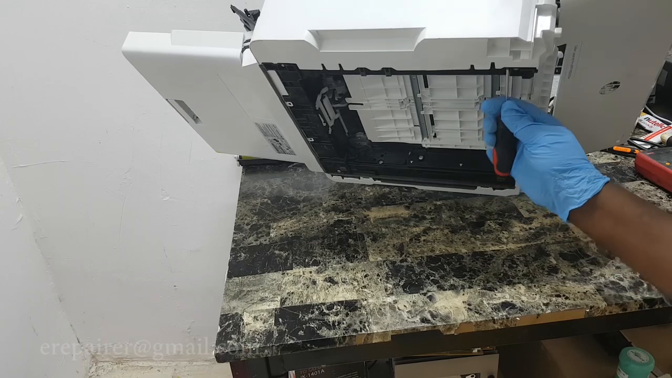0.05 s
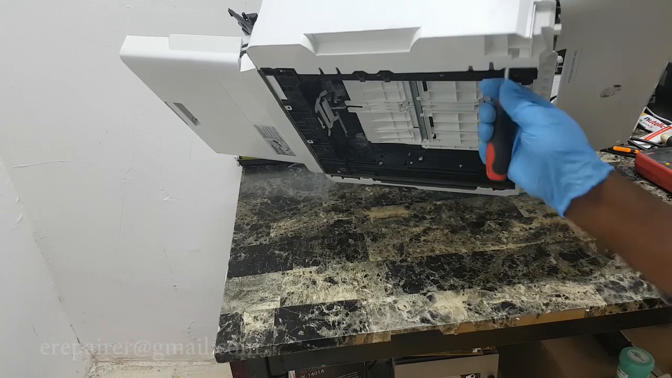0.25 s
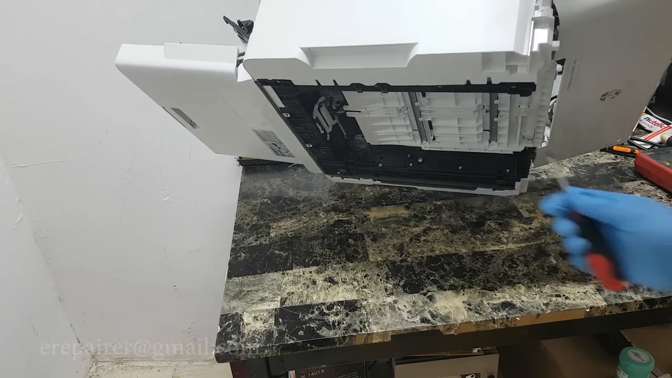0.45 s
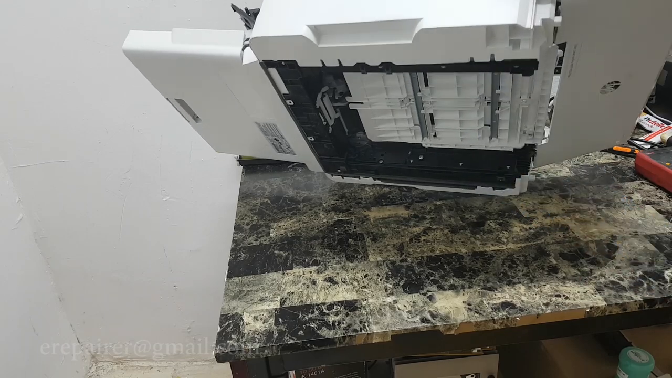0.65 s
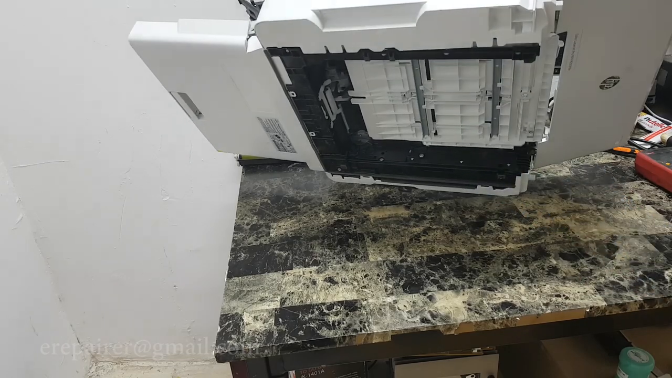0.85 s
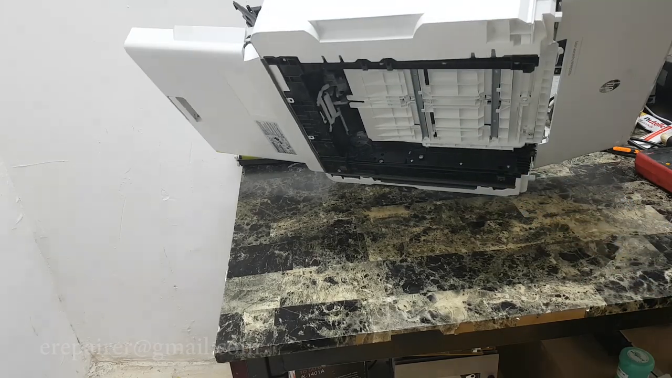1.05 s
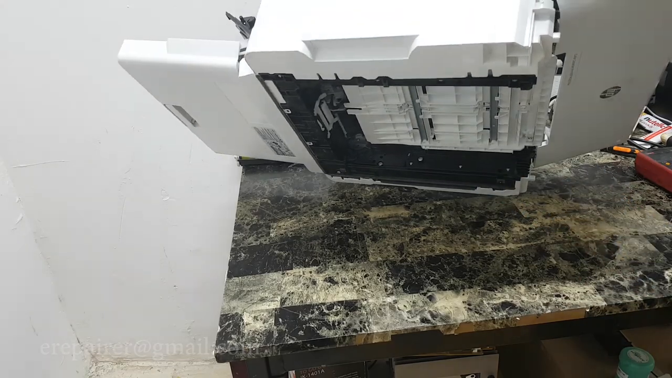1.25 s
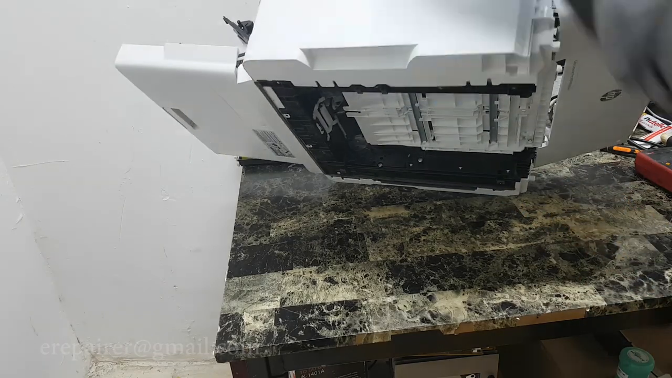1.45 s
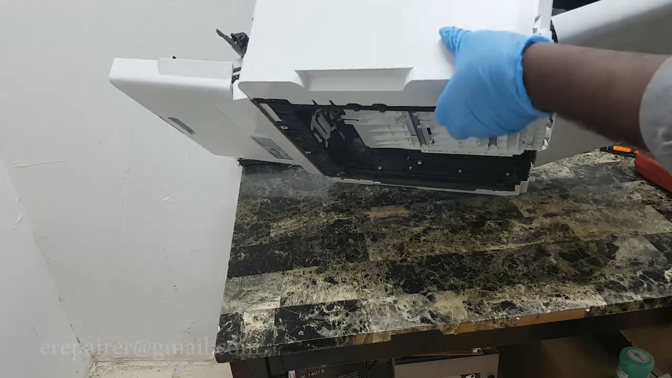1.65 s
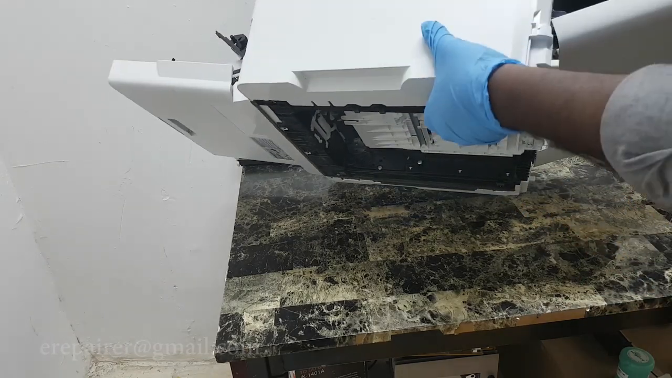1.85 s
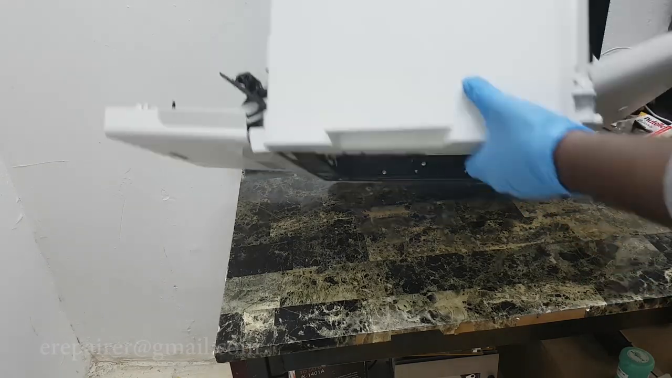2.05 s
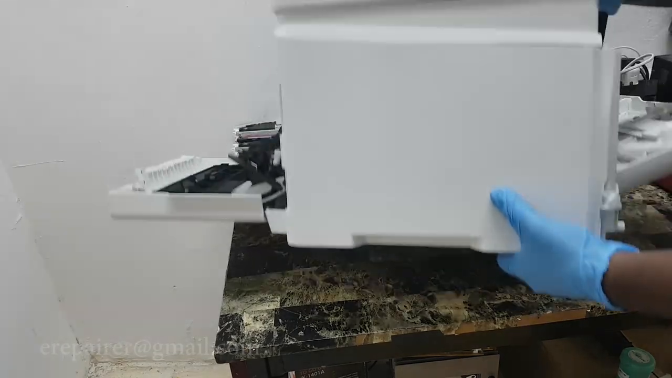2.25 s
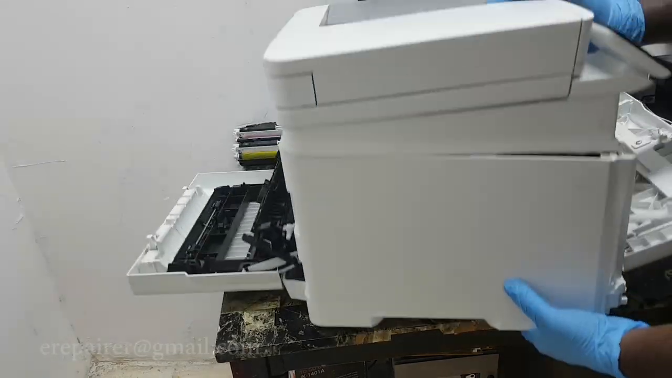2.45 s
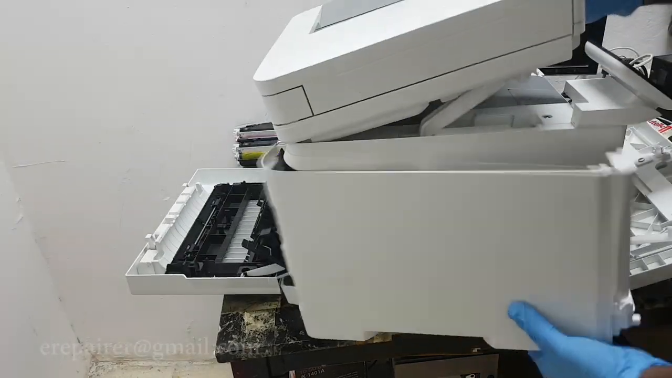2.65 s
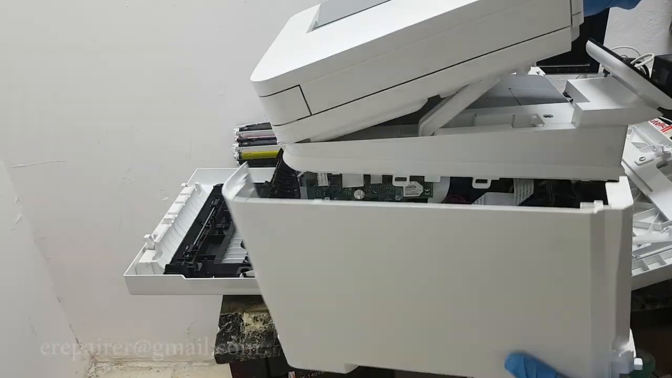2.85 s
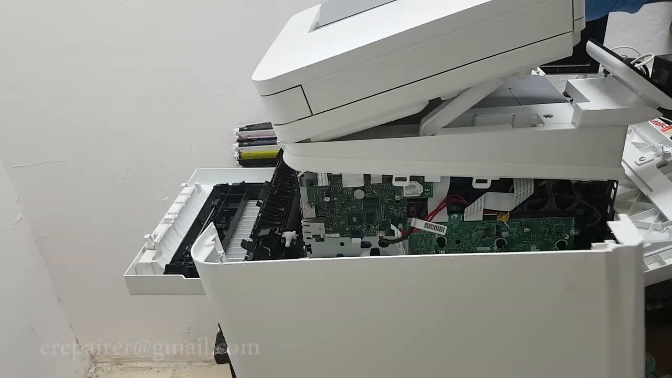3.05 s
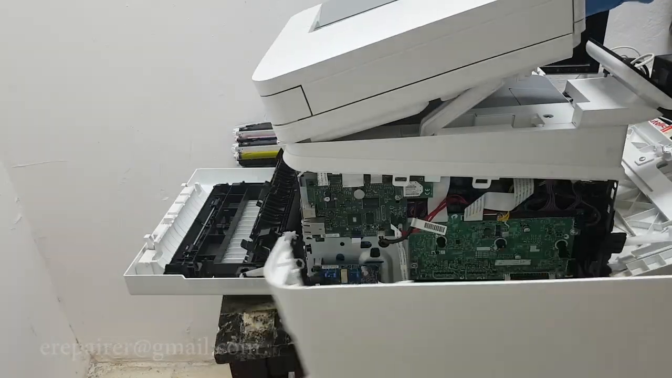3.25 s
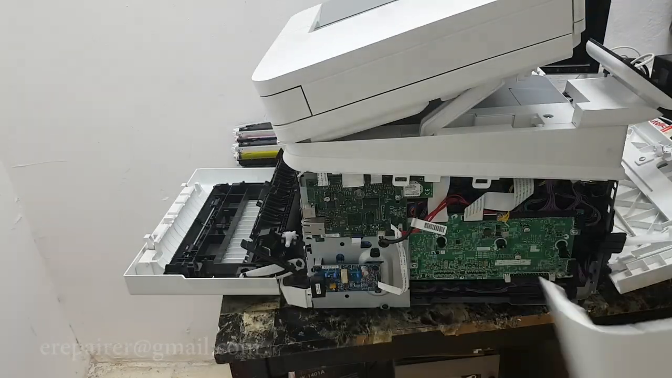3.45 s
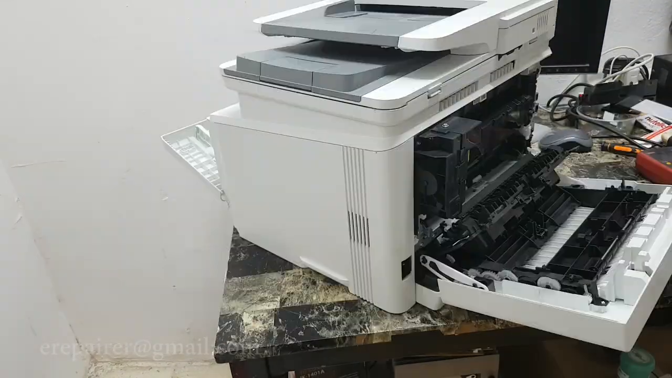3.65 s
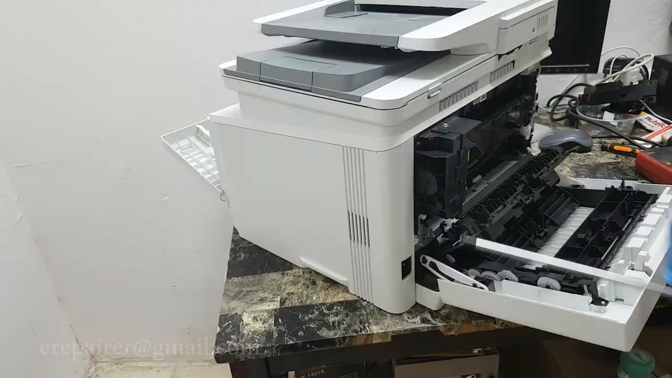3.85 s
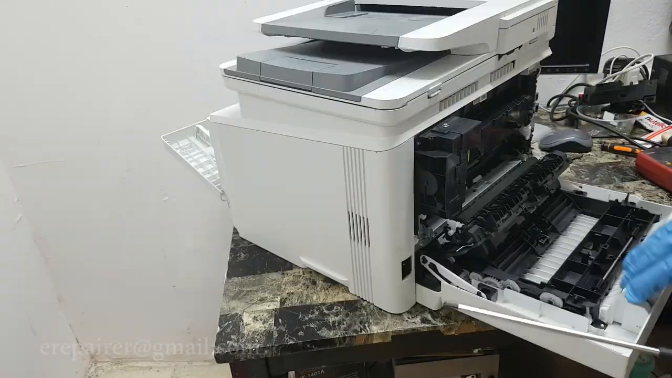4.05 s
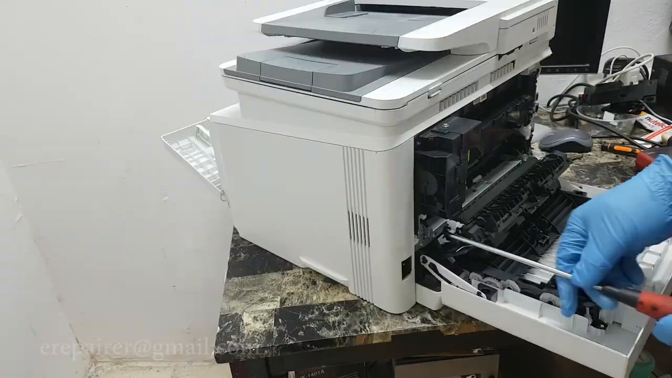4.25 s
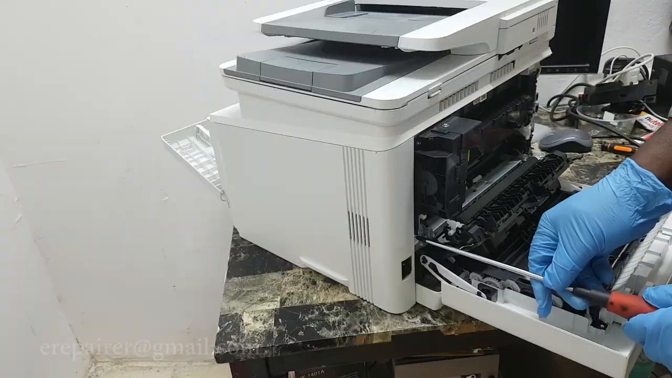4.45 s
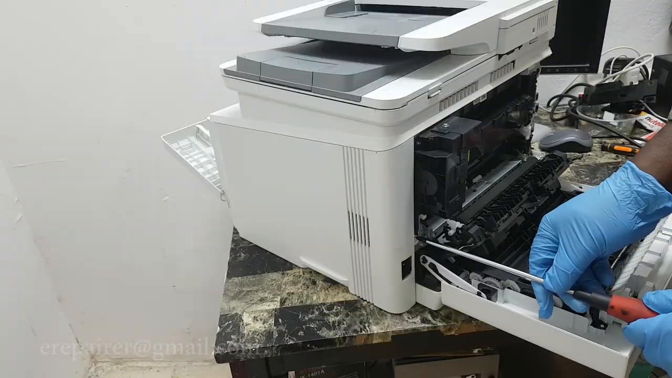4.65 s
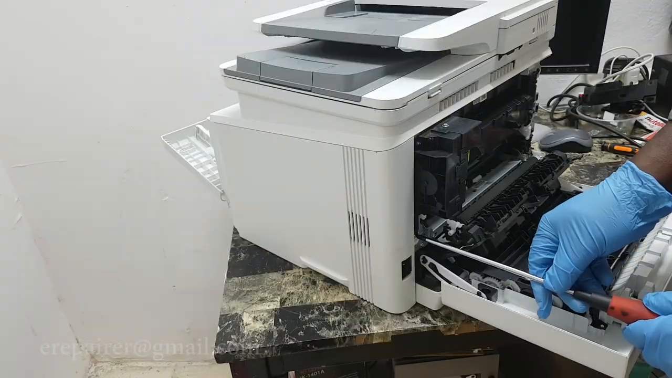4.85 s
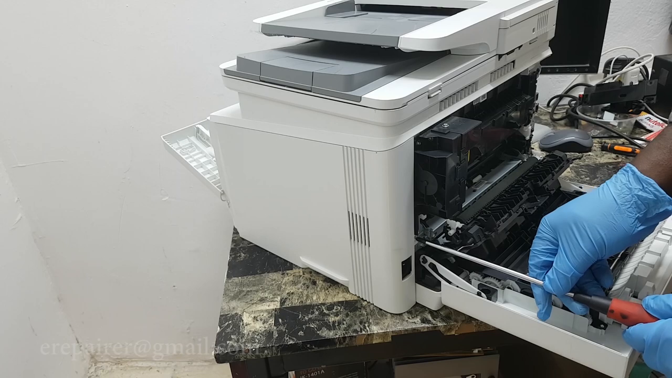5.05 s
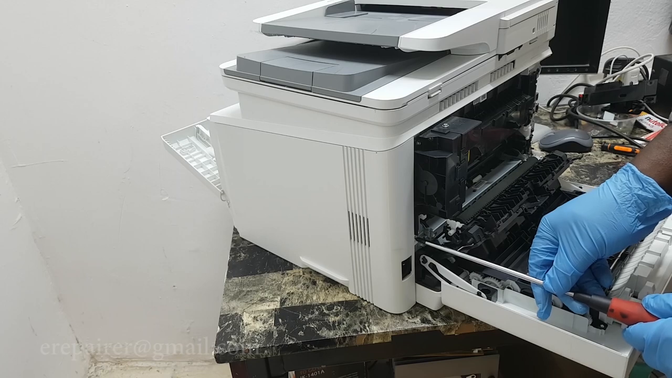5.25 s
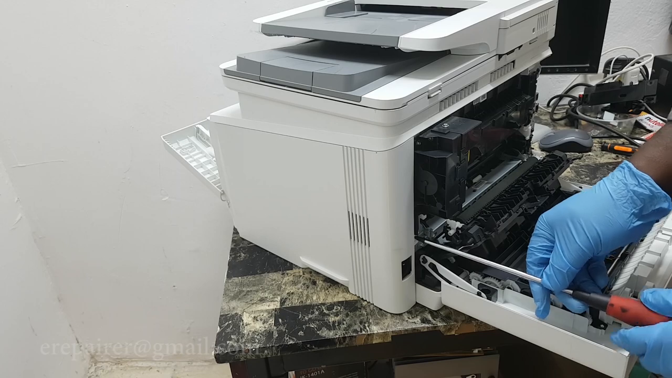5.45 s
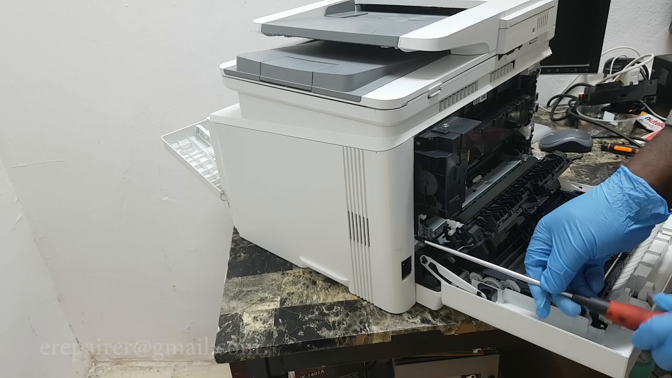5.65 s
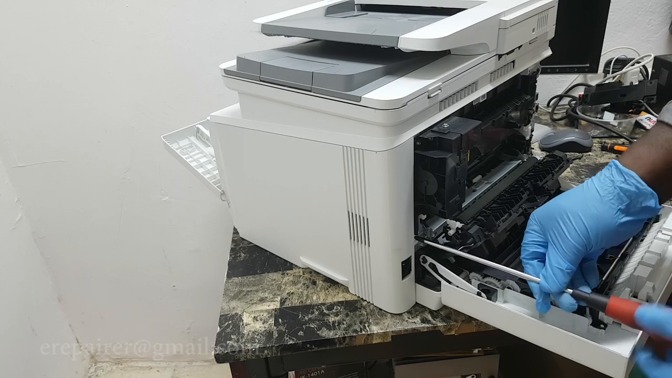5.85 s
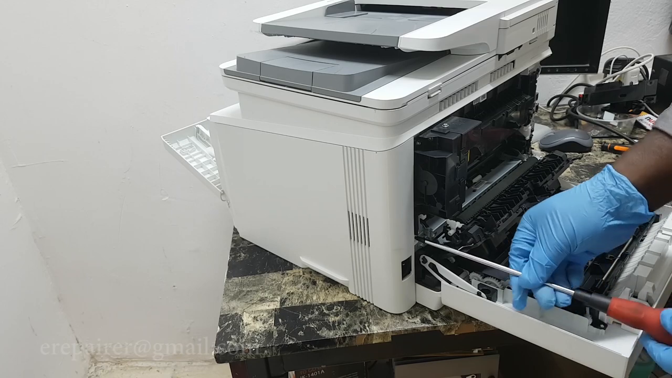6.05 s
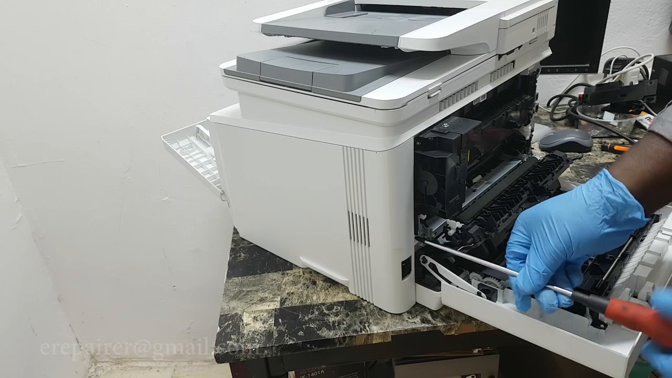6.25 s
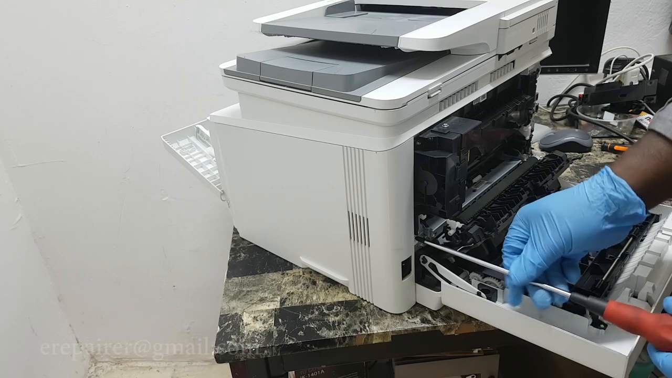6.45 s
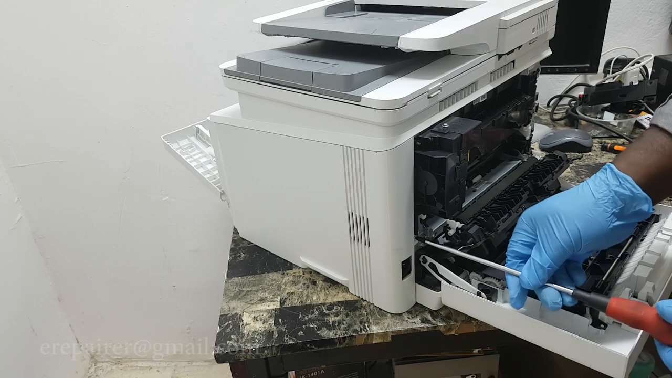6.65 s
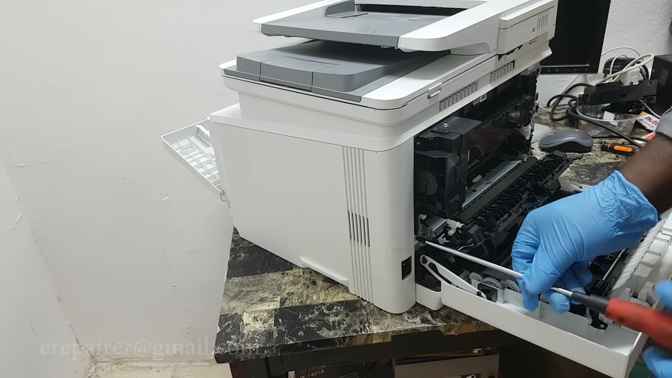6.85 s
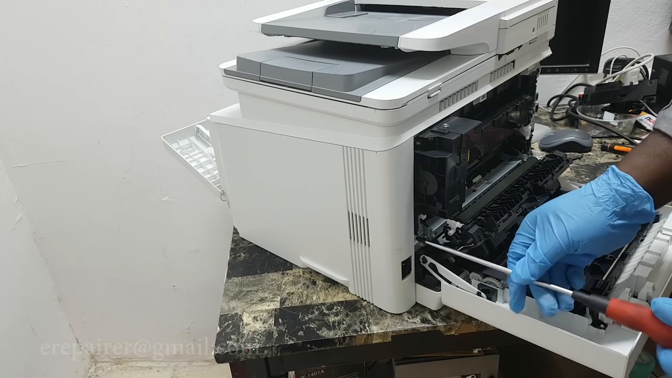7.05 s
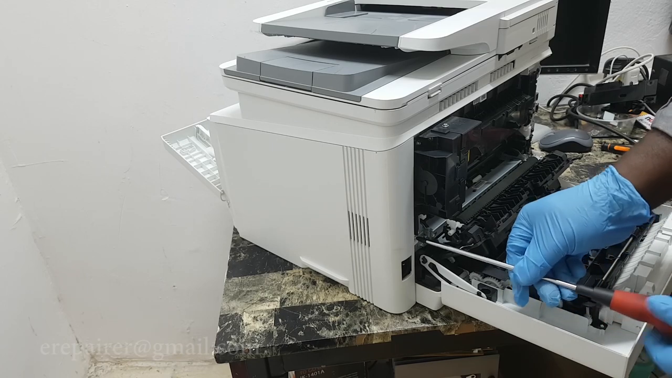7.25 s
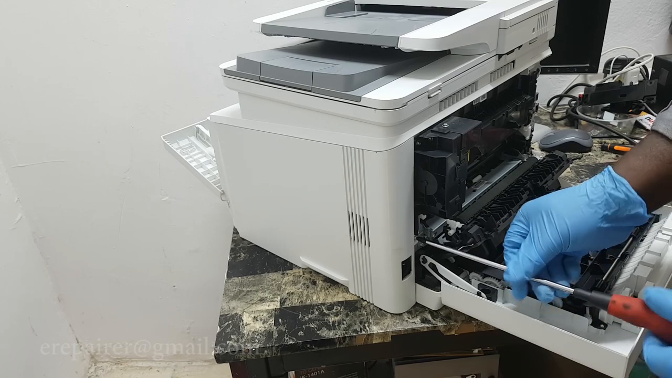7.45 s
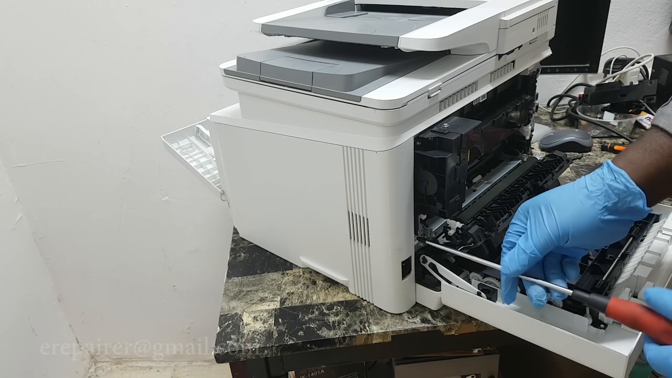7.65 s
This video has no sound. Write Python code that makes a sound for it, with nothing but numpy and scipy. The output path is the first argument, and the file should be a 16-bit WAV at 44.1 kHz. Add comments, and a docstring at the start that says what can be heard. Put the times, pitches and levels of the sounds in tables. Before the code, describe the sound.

A small hard room has a quiet, mostly low hush and faint wavering fan hum throughout. Light plastic ticks open the scene, then catches snap very loudly at 0.25-0.3 s with a hollow ring. Another bright double snap comes at 0.86 s and a faint click near 1.05. Soft, slightly grainy rubbing grows from 1 to 2.3 s, with a sharp knock at 1.75. A faint low drone swells and sinks, strongest near 2.6. Rattling knocks from 2.35 build to the loudest, crashing plastic clatter at 2.67-2.76, followed by a tiny unsteady groan at 2.9 and fading rubs until 3.5. A crisp door knock strikes at 4.01 s. From 4.5 to 5.7 light screwdriver taps ring faintly; then, to the end around 7.7, minute irregular clicks, light scrapes and nearly inaudible high squeaks. Close stereo, treble wide, short room tail.

```python
"""A plastic printer is worked on in a small hard-walled room: air and a humming fan are filtered noise and sines.
Catches snap first, each a burst of noise with ringing tones, while slightly grainy noise makes the rubbing strokes.
A faint low drone, one gliding sine, swells and sinks; the side cover knocks and breaks free with a clatter.
It groans as it slides off, in short unsteady tones; then the front door and its fittings knock.
Last, a screwdriver taps its way to a screw and turns it, with small clicks and squeaks."""
import sys
import numpy as np
from scipy import signal
from scipy.fft import rfft, irfft, next_fast_len
from scipy.io import wavfile

SR = 44100
rng = np.random.default_rng(int(sys.argv[2]) if len(sys.argv) > 2 else 0)


def transcribe(u):
    """Save the signal u as a 16-bit wav file named by the first command-line argument.

    u: samples, shape (n,) or (channels, n), limited to [-1, 1]; the rate is SR.
    q: integer samples, one column per channel.
    """
    v = np.clip(np.atleast_2d(u).T, -1, 1)
    q = np.round(v * 32767).astype(np.int16)
    wavfile.write(sys.argv[1], SR, q)


N = 340011
TIME = np.arange(N) / SR   # seconds
RING_SIZE = 20000   # length of one contact sound, in samples
CUTOFF_HZ = 16000   # top of the sound

# room air: (frequency [Hz], relative strength [dB per Hz])
AIR_SPECTRUM = [(12, -43), (20, -13), (32, -21), (74, -12.5), (96, -6.5), (163, -4), (193, -20.5),
                (222, -7.5), (310, -7), (574, -9.5), (1260, -14.5), (1660, -17.5), (1810, -18), (9140, -26),
                (16000, -32)]
AIR_LEVEL_DB = -58.5   # rms of the room air over both sides, balance included
# fan hum tones: (frequency [Hz], rms before loudness changes and balance [dB])
FAN_TONES = [(108, -71.5), (158, -72), (312, -66.5), (427, -72), (535, -75.5), (657, -78.5)]
# fan loudness change: (time [s], change [dB])
FAN_LOUDNESS = [(0, 2), (3.6, -3.5), (3.7, 0), (7.7, 1)]
# low drone: (time [s], average frequency [Hz], rms before trim, flutter and balance [dB])
DRONE_PATH = [(0.0, 98.8, -84), (0.1, 106.8, -66.5), (1.26, 102.8, -55), (1.35, 100.5, -64),
              (1.87, 98.27, -51.5), (2.13, 109.1, -51), (2.2, 112.8, -68), (2.63, 106.5, -43.5),
              (2.86, 95.8, -60.5), (3.14, 74.26, -73), (3.59, 66.87, -63.5), (3.7, 61.77, -78)]
DRONE_TRIM_DB, DRONE_FADE_DB_PER_S = -2.5, 91.5   # the fade starts after the last row

# likeness of the two microphones: (frequency [Hz], correlation [0 to 1])
MIC_LIKENESS = [(25, .3), (70, 0.4), (300, 0.96), (700, 0.85), (1400, 0.58), (2800, 0.13), (6000, 0.18),
                (16000, 0.076)]
# left-right balance: (frequency [Hz], left minus right [dB])
LEFT_MINUS_RIGHT = [(25, 6), (125, 3), (300, 4.5), (600, 2.5), (1400, 2.5), (4000, 1.6), (12000, 0.04)]
LEFT_LAG_S = .00004   # noise reaches the left this much later

# catches being prised: (time [s], level [dB], hardness as tilt [dB per octave], wall flex [dB],
# pitch of struck part [Hz], its resonance [dB], time to fall 60 dB [s])
CATCH_HITS = [(0.019, -25, 0, 0, 3870, 4.5, 0.28), (0.025, -18.5, -1.5, -7, 722, 7.5, 0.17),
              (0.112, -38, -6, 5, 1320, 1, 0.19), (0.176, -38, -11, -3, 626, 7, 0.11),
              (0.183, -21.5, 0, 0, 721, 7, 0.19), (0.245, -2.5, 2, 3.5, 1329, 9.5, .15),
              (0.253, -3.5, 2.5, 0, 1590, 9, .18), (0.268, -7, 2, -2, 1375, 5.5, 0.13),
              (0.29, -8.5, 2.5, 0, 1590, 1, 0.22), (0.743, -40, -3, 3, 670, 0, 0.71),
              (0.859, -11, 1.6, 7.5, 4680, 9, 0.16), (0.868, -15, 0.5, 4, 4420, 12.5, 0.26),
              (1.024, -43.5, -4, 10, 1400, 5.5, 0.15), (1.054, -23.5, 0.1, -7, 600, 3, 0.2),
              (1.284, -45, -1, -4, 3400, 9, 0.13)]
# cover knocking and breaking free: (time [s], level [dB], hardness as tilt [dB per octave], wall flex [dB],
# pitch of struck part [Hz], its resonance [dB], time to fall 60 dB [s])
COVER_HITS = [(1.686, -31.5, -4.5, 0.5, 693, 3.6, .25), (1.749, -9, 2, -5.5, 1377, 9.1, 0.17),
              (2.29, -40, -4.5, 1, 966, 7, 0.34), (2.355, -14.5, 3, -7.5, 2480, 1.56, 0.15),
              (2.366, -16, -0.2, -5, 596, 2.8, 0.32), (2.416, -12, 1.97, -0.5, 6100, 1.4, .17),
              (2.485, -22, 2, -7, 1447, 6, .2), (2.546, -15, 1.57, 0.5, 1430, 3.2, .24),
              (2.582, -25, -2.5, -10, 1260, 3, .35), (2.67, 4.5, -0.6, 3.5, 4200, 4.2, .24),
              (2.691, 1.5, 0.8, 5, 1396, 3.2, 0.21), (2.716, -2, -1.47, 5, 1359, 4.9, 0.15),
              (2.7555, -3, -0.9, -3.5, 1368, 11, 0.14)]
# front door and its fittings: (time [s], level [dB], hardness as tilt [dB per octave], wall flex [dB],
# pitch of struck part [Hz], its resonance [dB], time to fall 60 dB [s])
DOOR_HITS = [(3.961, -33, 1.4, 2, 1537, 1.7, .26), (4.011, -12.5, 2.1, 7, 3000, 0.78, 0.23),
             (4.023, -5.5, 1.55, 3.5, 2630, 1.2, .21), (4.143, -35.5, -2.5, -7.5, 307.4, 6.2, 0.19),
             (4.302, -37.5, -1.1, -2.5, 301, 6.4, 0.2)]
# screwdriver tip meeting screw and frame: (time [s], level [dB], hardness as tilt [dB per octave],
# wall flex [dB], pitch of struck part [Hz], its resonance [dB], time to fall 60 dB [s])
TOOL_TAPS = [(4.491, -34, 4.5, 7, 5210, 2.8, 0.16), (4.808, -33, -1, 0, 449, 5.1, 0.2),
             (5.004, -43.5, -1.5, 5, 4080, 4.1, 0.21), (5.116, -27, 0.9, -3, 477, 4.3, .19),
             (5.327, -24, 1.4, 0, 2820, 1.7, 0.19), (5.502, -26.5, -2, -0.5, 441, 3.1, 0.16),
             (5.519, -36, -5, 0, 620, 6.6, 0.2), (5.697, -30, 3.2, -2, 4160, 1, 0.19)]
# the screw slipping in its thread: (time [s], level added to its tone colour [dB])
SCREW_SLIPS = [(5.884, -49), (5.9391, -43.5), (6.1193, -45.5), (6.5805, -47), (6.6171, -45.5),
               (6.7642, -41.5), (7.0315, -45), (7.1678, -43), (7.4604, -41), (7.5119, -39), (7.6025, -44)]

# ringing around the catches: (frequency [Hz], average level against nearby tone [dB], time to fall 60 dB [s])
SHELL_MODES = [(344, -4.5, 0.27), (460, -10, 0.14), (578, -12, 0.1), (700, -4.5, .16), (1020, -10, 0.091),
               (1155, -9.5, 0.046), (1336, -5.5, 0.049), (1620, -5.5, 0.12), (1640, -10.5, .17),
               (2180, -10.5, .16), (2420, -10.5, 0.15), (2770, -11, 0.1), (4100, -15, 0.067),
               (4225, -14.5, .17), (4800, -16.5, .17)]
# side cover ringing: (frequency [Hz], average level against nearby tone [dB], time to fall 60 dB [s])
PANEL_MODES = [(223, -3.5, 0.14), (295, -3, 0.33), (453, -3.5, 0.16), (535, -0.5, 0.19), (575, -4.5, 0.067),
               (671, -4, .18), (703, -8, 0.068), (930, -12, 0.29), (1178, -10, 0.14), (1339.5, -3, 0.14),
               (1397, -1, 0.093), (1424, -13, 0.098), (1794, -12.5, 0.098), (2250, -11.5, 0.13),
               (2750, -10.5, .13), (3150, -12.5, 0.099), (4173, -9.5, 0.1), (6030, -16, 0.16),
               (7160, -11.5, 0.097)]
# door ringing: (frequency [Hz], average level against nearby tone [dB], time to fall 60 dB [s])
FLAP_MODES = [(73, -1, 0.33), (229, -19, 0.1), (306.7, -3, 0.38), (416, -4.5, 0.21), (540, -3.5, 0.14),
              (666, -25, 0.12), (1026, -9.5, 0.2), (1647, 2.5, 0.083), (1842, -9, 0.082), (2570, -11, 0.13),
              (3170, -13, .15)]
# frame and screwdriver shaft ringing: (frequency [Hz], average level against nearby tone [dB],
# time to fall 60 dB [s])
FRAME_MODES = [(415.4, 1.5, 0.29), (483, 2.5, 0.29), (670.6, -1.5, 0.28), (1598, -8, 0.17),
               (1723, -4, 0.089), (2260, -9.5, 0.12), (2606, -9, 0.099), (2980, -4.5, 0.085),
               (4250, -12.5, 0.11), (5180, -13, 0.13), (7080, -7, 0.091)]

# average tone of a contact around the catches: (frequency [Hz], level before each hit's settings [dB per octave])
SHELL_TONE = [(50, -69), (220, -34.5), (640, -20), (1270, -19.5), (2500, -15.5), (4950, -16),
              (10600, -18.5), (16000, -25.5)]
# average tone of the side cover: (frequency [Hz], level before each hit's settings [dB per octave])
PANEL_TONE = [(50, -79.5), (220, -35), (640, -24), (1270, -21.5), (2500, -16), (4950, -17), (10600, -20),
              (16000, -23.5)]
# average tone of the door: (frequency [Hz], level before each hit's settings [dB per octave])
FLAP_TONE = [(50, -52), (220, -27), (640, -23), (1270, -23.5), (2500, -18), (4950, -12), (10600, -17.5),
             (16000, -20.5)]
# average tone of the frame: (frequency [Hz], level before each hit's settings [dB per octave])
FRAME_TONE = [(50, -73), (220, -35.5), (640, -25), (1270, -21), (2500, -21.5), (4950, -18.5),
              (10600, -25.5), (16000, -31)]
# tone of a screw slip: (frequency [Hz], level before each slip's own [dB per octave])
SLIP_TONE = [(50, -38), (220, -16), (640, -19.5), (1270, -19.5), (2500, -16), (4950, -18), (10600, -15.5),
             (16000, -24)]
PRINTER_MID_HZ, FLEX_OCTAVES = 1783.6, 1.3   # a flexing wall booms here; hardness tilts about it
PART_OCTAVES = 0.52   # width of the struck part's resonance
TILT_RANGE_HZ = (259, 10600)   # the tilt stays level outside this range

# hands and cover stroking the plastic: (start [s], length [s], dull rub [dB], scratch against the rub [dB])
RUB_STROKES = [(0.06, 0.12, -56, 6), (0.97, 0.78, -59, -4), (1.372, .26, -56.5, 3.5),
               (1.56, 0.36, -54.5, -6), (1.767, 0.64, -52, -3), (2.026, .19, -47, 4),
               (2.197, 0.19, -66, -14), (2.584, 0.12, -43.5, 2), (2.828, 0.15, -46, -9),
               (3.01, 0.4, -55.5, -0.5), (3.401, 0.13, -74.5, 11), (3.709, .24, -74.5, 11),
               (5.725, .6, -67, -4), (6.726, .14, -57.5, 1.5), (7.133, .14, -62, -1.5),
               (7.413, 0.21, -60, -5)]
# dull rub of the panel: (frequency [Hz], relative strength [dB per Hz])
DULL_SPECTRUM = [(150, -39.5), (250, -16), (297, 1), (368, 0), (735, -2), (858, -4.5), (1050, 2),
                 (1120, -7.5), (2500, -17), (3250, -43.5), (5500, -120)]
# brighter scratch: (frequency [Hz], relative strength [dB per Hz])
SCRATCH_SPECTRUM = [(880, -27.5), (1500, -7.5), (2440, -10), (2640, -4.5), (6120, -10), (7100, -14),
                    (10000, -15), (15100, -21), (16000, -21.5)]
STROKE_ATTACK, STROKE_RELEASE = 0.32, 0.61   # shares of a stroke's length

# the cover groans as it slides off, the screw squeaks as it turns:
# (start [s], length [s], highest average pitch [Hz], rms at the height of the swell before balance [dB])
SQUEAK_TONES = [(2.861, 0.071, 741, -47), (2.895, 0.053, 596, -49), (5.76, 0.09, 1590, -67),
                (5.875, 0.046, 1700, -57.5), (7.175, 0.1, 1590, -67), (7.314, 0.076, 1680, -60),
                (7.391, .07, 1490, -66.5)]


def from_db(db):
    """Turn decibels into gain."""
    return 10 ** (np.asarray(db) / 20)


def rms_one(x):
    """Scale a sound to an rms of 1."""
    return x / np.sqrt(np.mean(x ** 2) + 1e-20)


def at_hz(points, hz):
    """Read a curve with frequency spaced by ratio, as pitch is heard."""
    points = np.array(points)
    return np.interp(np.log(np.maximum(hz, 1)), np.log(points[:, 0]), points[:, 1])


def in_time(rows):
    """Read each column of a timed table at every sample."""
    s, *columns = np.transpose(rows)
    return [np.interp(TIME, s, column) for column in columns]


def hump(hz, centre_hz, octaves):
    """A bell of height 1, equally wide in pitch on both sides."""
    return np.exp(-(np.log2(hz / centre_hz) / octaves) ** 2)


def drift(rate):
    """Random wander: straight lines joining `rate` random points a second."""
    knots = rng.standard_normal(4000)
    return np.interp(TIME * rate, np.arange(len(knots)), knots)


def sine(hz):
    """A sine whose pitch changes smoothly: its phase adds up the frequency."""
    phase = 2 * np.pi * np.cumsum(hz) / SR
    return np.sin(phase)


def add(out, sound, s):
    """Mix a sound in at time s, in seconds."""
    start = max(round(s * SR), 0)
    out[:, start:start + sound.shape[1]] += sound[:, :N - start]


def sides(hz):
    """Left and right gain at these frequencies."""
    return from_db(at_hz(LEFT_MINUS_RIGHT, hz) * np.array([[.5], [-.5]]))


def stereo_noise(size):
    """White noise at two close microphones: much more alike in the low middle than in the treble."""
    hz = np.fft.rfftfreq(size, 1 / SR)
    alike = np.clip(at_hz(MIC_LIKENESS, hz), 0, 1)
    white = rfft(rng.standard_normal((3, size)))
    pair = np.sqrt(alike) * white[0] + np.sqrt(1 - alike) * white[1:]
    pair[0] *= np.exp(-2j * np.pi * hz * LEFT_LAG_S)
    return irfft(pair * sides(hz), size)


def colour(x, spectrum):
    """Filter to a dB curve with no sound ahead of its cause (minimum phase)."""
    count = x.shape[-1]
    size = 2 * next_fast_len(count // 2 + 2048)
    log_gain = np.log(from_db(at_hz(spectrum, np.fft.rfftfreq(size, 1 / SR))))
    # folding the cepstrum (spectrum of the log gain) gives the phase
    cepstrum = irfft(log_gain)
    cepstrum[1:size // 2] *= 2
    cepstrum[size // 2 + 1:] = 0
    return irfft(rfft(x, size) * np.exp(rfft(cepstrum)))[..., :count]


def blow(tone, t60, modes, crack_db=2.5, crack_s=0.0019, spiky=0.34, early_s=0.023,
         build_s=0.0018, scatter_db=1.5, ripple_db=2.3, ripple_count=110, grid_size=400,
         rise_s=0.00061, damping_db_per_s=45.5, damping_hz=4000):
    """One contact: a crack, spiky reflections merging into the room's tail, and ringing modes."""
    t = np.arange(RING_SIZE) / SR
    grid = np.geomspace(50, CUTOFF_HZ, grid_size)
    # turn level per octave into level per Hz of white noise
    per_hz = at_hz(tone, grid) - 10 * np.log10(np.sqrt(2) * grid / SR)
    # countless damped modes ripple the spectrum, differently at each contact
    ripple = ripple_db * signal.resample(rng.standard_normal(ripple_count), grid_size)
    spectrum = np.transpose([grid, per_hz + ripple])

    # early reflections jump in strength every 10 samples, later ones even out
    spread = spiky * np.exp(-t / early_s)
    jumps = np.repeat(np.minimum(rng.standard_normal(RING_SIZE // 10), 2), 10)
    arrivals = np.exp(spread * jumps - spread ** 2)
    crack = from_db(crack_db) * np.exp(-t / crack_s) / 2
    fade = from_db(-60 * t / t60) * (1 + crack)
    rise = 1 - np.exp(-t / rise_s)
    burst = stereo_noise(RING_SIZE) * arrivals * fade * rise

    # air and walls take the treble first
    dull = signal.lfilter(*signal.butter(1, damping_hz, fs=SR), burst)
    treble = (burst - dull) * from_db(-damping_db_per_s * t)
    out = colour(dull + treble, spectrum)

    # the strong modes swell for a moment and ring on
    for hz, mode_db, mode_t60 in modes:
        level_db = at_hz(tone, hz) + mode_db + rng.normal(0, scatter_db)
        # the less alike the microphones, the more their phases differ
        side_spread = np.sqrt(max(1 - at_hz(MIC_LIKENESS, hz), 0) / 2)
        phase = rng.uniform(0, 2 * np.pi) + rng.standard_normal((2, 1)) * side_spread
        swing = from_db(level_db - 60 * t / mode_t60) * (1 - np.exp(-t / build_s))
        out = out + np.sqrt(2) * sides(hz) * swing * np.sin(2 * np.pi * hz * t + phase)
    return out


def blows(table, modes, body_tone, note_db, note_t60=0.12, note_cycles=400, ring_gain=.3):
    """Contacts on one body: hardness brightens, wall flex changes the middle, the struck part rings."""
    out = np.zeros((2, N))
    hz = np.geomspace(50, CUTOFF_HZ, 120)
    octaves = np.log2(np.clip(hz, *TILT_RANGE_HZ) / PRINTER_MID_HZ)
    for s, level_db, hardness, flex_db, part_hz, part_db, t60 in table:
        tilt = hardness * octaves
        flex = flex_db * hump(hz, PRINTER_MID_HZ, FLEX_OCTAVES)
        part = part_db * hump(hz, part_hz, PART_OCTAVES)
        tone_db = at_hz(body_tone, hz) + level_db + tilt + flex + part
        # a stronger resonance rings longer, high notes die sooner
        ring_s = min(note_t60 * from_db(ring_gain * part_db), note_cycles / part_hz)
        note = (part_hz, note_db, ring_s)
        add(out, blow(np.transpose([hz, tone_db]), max(t60, .03), [*modes, note]), s)
    return out


def room_air():
    """Room air: steady noise shaped to a soft, mostly low hush."""
    noise = stereo_noise(next_fast_len(N))[:, :N]
    return from_db(AIR_LEVEL_DB) * rms_one(colour(noise, AIR_SPECTRUM))


def fan_hum(waver=0.025, flutter_db=5.0):
    """Fan hum: several tones, each wavering in pitch and fluttering in loudness on its own."""
    out = np.zeros((2, N))
    change_db, = in_time(FAN_LOUDNESS)
    for hz, db in FAN_TONES:
        tone = sine(hz * (1 + waver * drift(25)))
        level_db = db + change_db + flutter_db * drift(20)
        out += np.sqrt(2) * sides(hz) * from_db(level_db) * tone
    return out


def low_drone(flutter_db=1.0, waver=0.025):
    """Low drone: one sine gliding in pitch and level, then fading away."""
    hz, db = in_time(DRONE_PATH)
    fade_db = DRONE_FADE_DB_PER_S * np.maximum(TIME - DRONE_PATH[-1][0], 0)
    tone = sine(hz * (1 + waver * drift(15)))
    level_db = db + DRONE_TRIM_DB - fade_db + flutter_db * drift(30)
    return np.sqrt(2) * sides(np.mean(hz)) * from_db(level_db) * tone


def catches():
    """Prised catches snap and set the plastic around them ringing."""
    return blows(CATCH_HITS, SHELL_MODES, SHELL_TONE, note_db=-3.5)


def rubbing(grain_db=1.0, grains_per_s=260):
    """Strokes gather speed, hold and slow; uneven grip makes dull rub and brighter scratch slightly grainy."""
    dull, scratch = np.zeros(N), np.zeros(N)
    for s, length, db, scratch_db in RUB_STROKES:
        progress = (TIME - s) / length
        speed = np.clip(np.minimum(progress / STROKE_ATTACK, (1 - progress) / STROKE_RELEASE), 0, 1)
        dull += speed * from_db(db)
        scratch += speed * from_db(db + scratch_db)
    grip = from_db(grain_db * drift(grains_per_s))
    friction = stereo_noise(next_fast_len(N))[:, :N] * grip
    dull_rub = dull * rms_one(colour(friction, DULL_SPECTRUM))
    return dull_rub + scratch * rms_one(colour(friction, SCRATCH_SPECTRUM))


def side_cover():
    """The cover knocks and breaks free, its panel ringing at each contact."""
    return blows(COVER_HITS, PANEL_MODES, PANEL_TONE, note_db=-2.0)


def squeaks(waver=0.024, glide=0.021):
    """Brief stick-slip tones: pitch and loudness rise and fall together, and the pitch jitters."""
    out = np.zeros((2, N))
    for s, length, hz, db in SQUEAK_TONES:
        swell = np.sin(np.pi * np.clip((TIME - s) / length, 0, 1))
        tone = sine(hz * (1 + glide * (swell - 1) + waver * drift(280)))
        out += np.sqrt(2) * sides(hz) * from_db(db) * swell * tone
    return out


def front_door():
    """The door and its fittings knock, and the door's modes ring."""
    return blows(DOOR_HITS, FLAP_MODES, FLAP_TONE, note_db=-2.5)


def screwdriver():
    """The tip taps screw and frame, and the frame and shaft ring."""
    return blows(TOOL_TAPS, FRAME_MODES, FRAME_TONE, note_db=-2.5)


def screw(t60=0.17, crackle_count=22, crackle_db=-53.0, crackle_spread_db=10.0):
    """Clear slips as the screw turns, with mostly fainter ones at random times among them."""
    out = np.zeros((2, N))
    chance = rng.random((crackle_count, 2))
    first_s = SCREW_SLIPS[0][0]
    times = first_s + chance[:, 0] * (N / SR - first_s) * .98
    levels_db = crackle_db + crackle_spread_db * (2 * chance[:, 1] - 1)
    for s, db in [*SCREW_SLIPS, *zip(times, levels_db)]:
        add(out, from_db(db) * blow(SLIP_TONE, t60, []), s)
    return out


def scene():
    """Room, casing and tool together."""
    room = room_air() + fan_hum() + low_drone()
    casing = catches() + rubbing() + side_cover() + squeaks() + front_door()
    return room + casing + screwdriver() + screw()


def record(dry):
    """Round off the loudest peaks and cut the top treble."""
    rounded = dry / (1 + dry ** 6) ** (1 / 6)
    top_cut = signal.ellip(10, .2, 70, CUTOFF_HZ, fs=SR, output="sos")
    return signal.sosfilt(top_cut, rounded)


dry = scene()
out = record(dry)
transcribe(out)
```